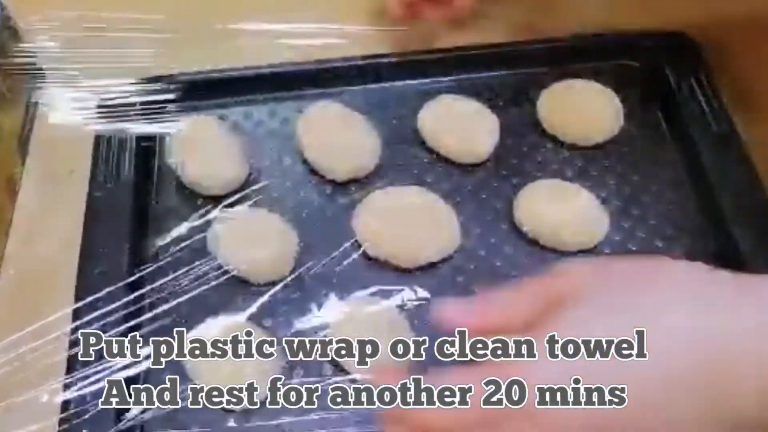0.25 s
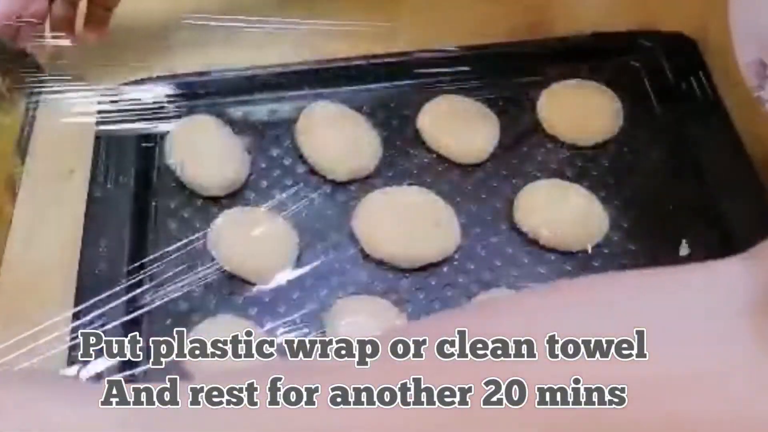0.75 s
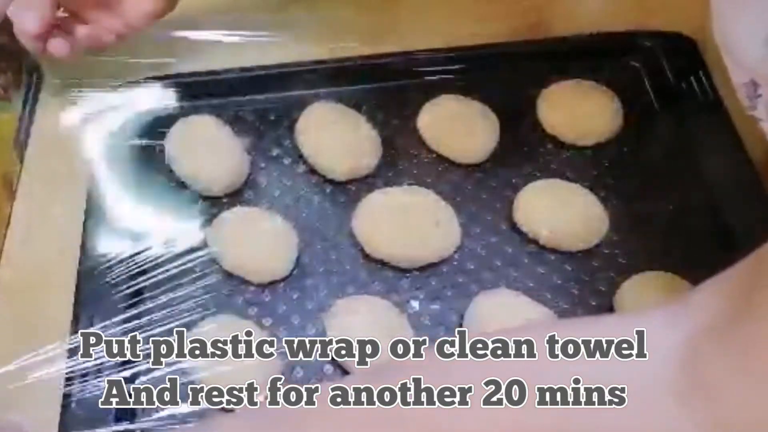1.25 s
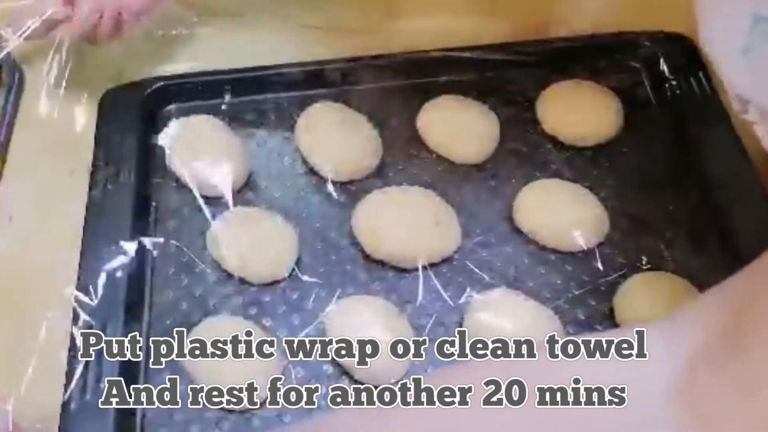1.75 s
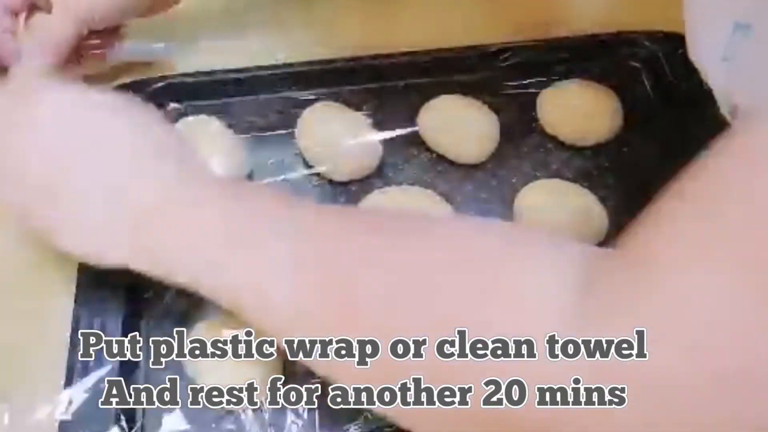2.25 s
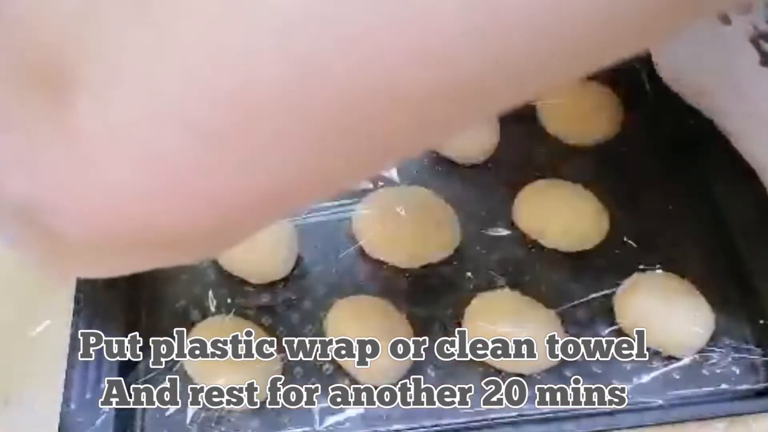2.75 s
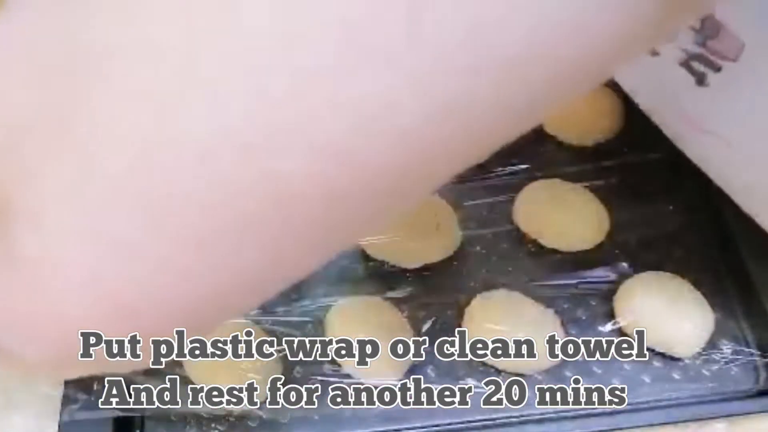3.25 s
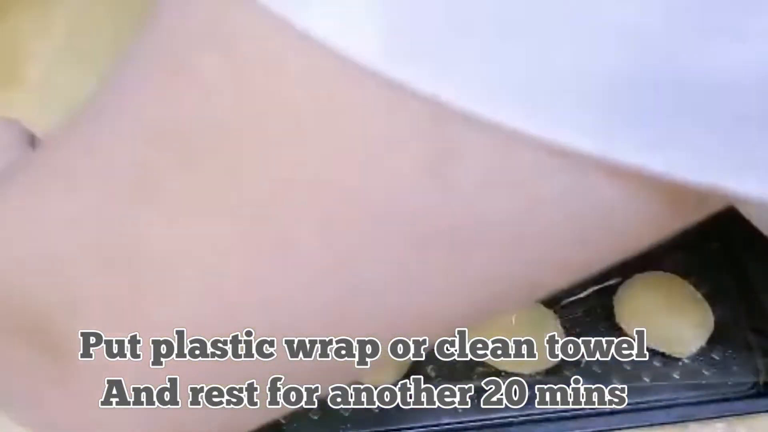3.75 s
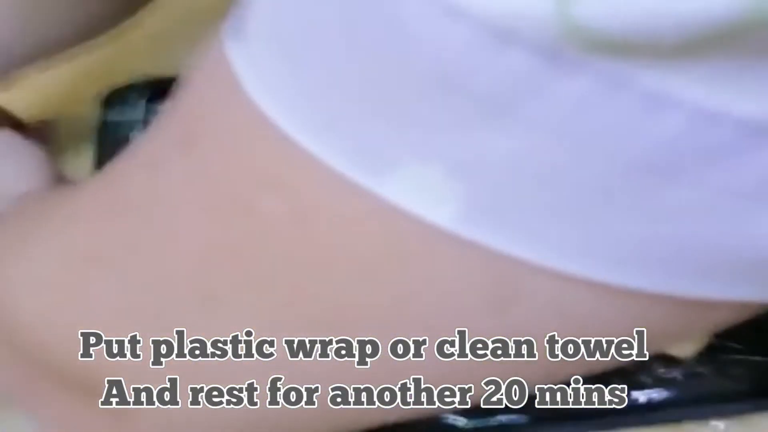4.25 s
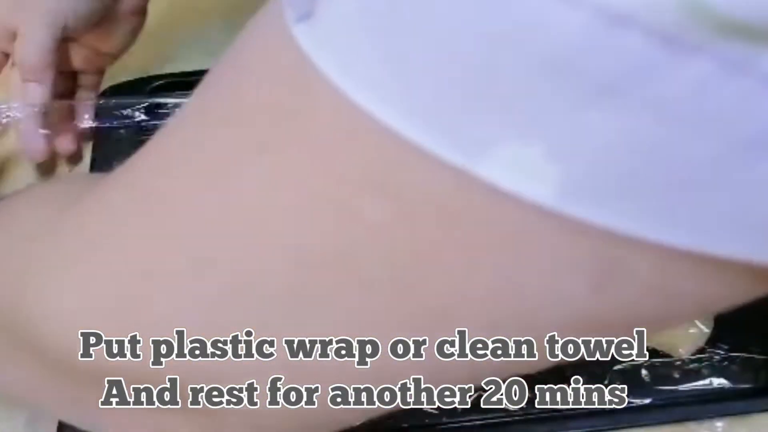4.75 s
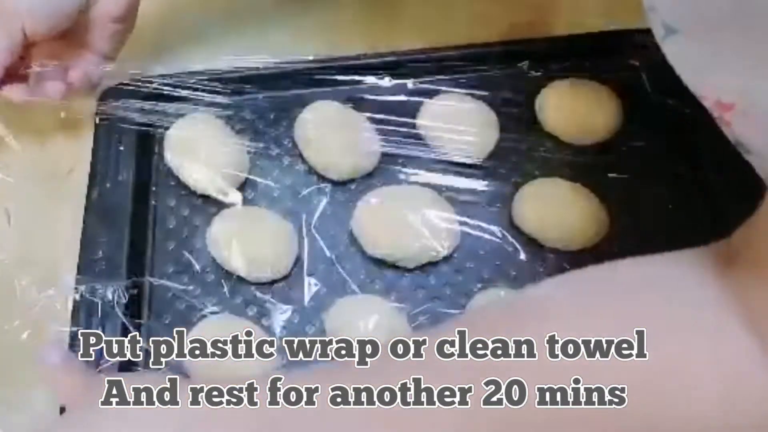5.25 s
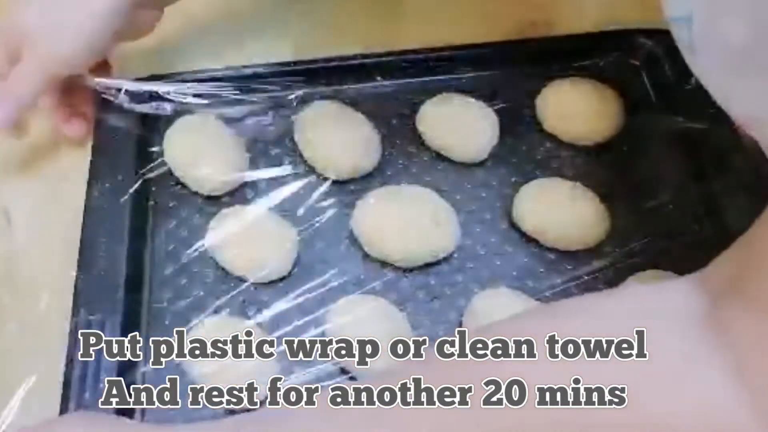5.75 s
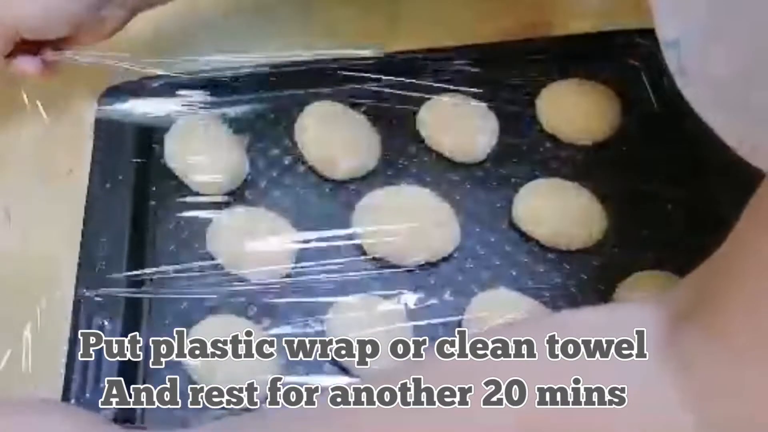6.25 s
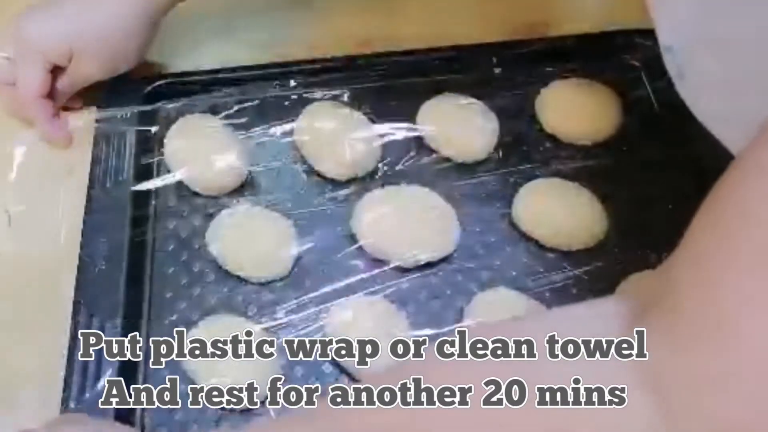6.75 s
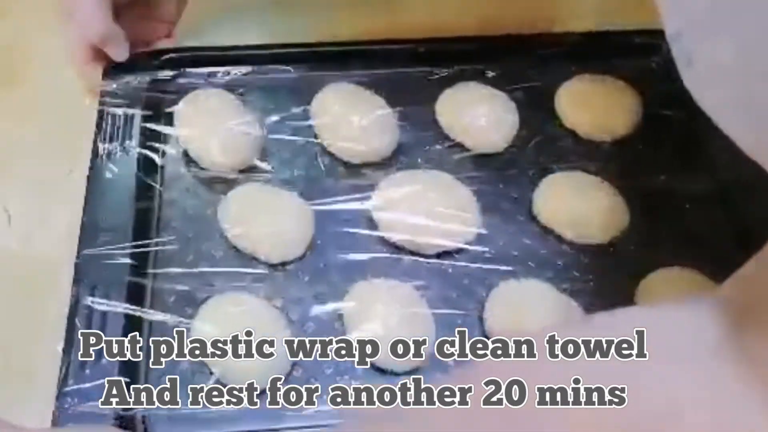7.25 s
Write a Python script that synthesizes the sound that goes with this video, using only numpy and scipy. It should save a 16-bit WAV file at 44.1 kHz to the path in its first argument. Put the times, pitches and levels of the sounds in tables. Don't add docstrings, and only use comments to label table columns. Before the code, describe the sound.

In a small, moderately live kitchen, a close microphone hears cling film being stretched over a metal baking tray on a wooden table. A faint low appliance hum and soft room wash run throughout. Faint film crackle opens, with a brighter rustle around 0.7 s. From 0.8 to 1.9 s the tray drags with a low rumble, light knocks and crisp snaps. After a quieter patch, a strong burst at 2.7-2.9 s mixes loud crackle, metallic ping and tray chatter. Dense bright ticks and snaps fill 3.2-3.7 s. At about 4.1 s the tray thumps down hard, then harder at 4.33 s, with deep wooden boom, bouncing metal clatter and a short ringing decay. A small scrape and finger slide come near 4.9 s. Sparse, quieter crinkles and ticks follow, with sharper little pulls at 6.5 and 6.8 s, until the end at 7.5 s.

```python
import sys
import numpy as np
from scipy import signal
from scipy.fft import rfft, irfft
from scipy.io import wavfile
from scipy.ndimage import uniform_filter1d

SR = 44100
rng = np.random.default_rng(int(sys.argv[2]) if len(sys.argv) > 2 else 0)


def invert_db(level):
    return 10 ** (np.asarray(level, dtype=float) / 20)


def to_wav(sig):
    pcm = np.clip(np.atleast_2d(sig), -1, 1) * 32767
    pcm = np.round(pcm).astype(np.int16)
    wavfile.write(sys.argv[1], SR, pcm.T)


N = 331146


def evened(x):
    return x / np.sqrt(np.mean(x ** 2) + 1e-20)


def read(points, hz):
    f, value = np.transpose(points)
    return np.interp(np.log(hz + 1), np.log(f + 1), value)


def add(mix, s, sound):
    part = mix[round(s * SR):][:len(sound)]
    part += sound[:len(part)]


def colour(x, points):
    hz = np.abs(np.fft.fftfreq(8192, 1 / SR))
    log_gain = np.log(invert_db(np.maximum(read(points, hz), -90)))
    taps = np.fft.ifft(np.exp(np.conj(signal.hilbert(log_gain)))).real[:4096]
    return signal.oaconvolve(x, taps / np.linalg.norm(taps))[:len(x)]


def level(rows, column=1):
    rows = np.asarray(rows)
    return invert_db(np.interp(np.arange(N) / SR, rows[:, 0], rows[:, column]))


def wavelet(hz, cycles):
    t = np.arange(round(cycles / hz * SR)) / SR
    envelope = np.sin(np.pi * (t / t[-1]) ** .85) ** .8
    return -np.sin(2 * np.pi * hz * t) * envelope


def bursts(per_s, spread_db, last_s):
    slips = rng.random(N) < per_s / SR
    size = invert_db(spread_db * np.minimum(rng.exponential(1, N), 3)) * slips
    decaying = signal.lfilter([1], [1, -np.exp(-1 / (last_s * SR))], size)
    puffs = uniform_filter1d(decaying, size=40)
    return evened(puffs * rng.standard_normal(N))


def split(x):
    top = signal.sosfiltfilt(signal.butter(3, 10300, "highpass", fs=SR, output="sos"), x)
    return x - top, top


def strokes(moves, levels_db, rise_db, fall_db_per_s):
    power, t = np.zeros(N), np.arange(SR) / SR
    for (s, rise, hold, *_), db in zip(moves, levels_db):
        swell_db = np.minimum(rise_db * (t / rise - 1), 0)
        fade_db = fall_db_per_s * np.maximum(t - rise - hold, 0)
        add(power, s, invert_db(2 * (db + swell_db - fade_db)))
    return np.sqrt(power)


# f/Hz, level/dB [dB per Hz]
WASH_SPECTRUM = [(12, -24.5), (30, 14.5), (45, -10.5), (85, -3.5), (140, -5), (240, -5), (370, -15.5),
                 (560, -13.5), (1100, -19), (1500, -26.5), (3000, -28), (8600, -40.5), (11000, -54),
                 (16000, -57)]
# t/s, level/dB
WASH_LEVEL = [(0, -48.5), (1, -49), (2, -49), (3, -48), (3.6, -51.5), (4.05, -48.5), (4.6, -53), (5, -50.5),
              (6, -50.5), (6.8, -51.5), (7.51, -49)]


def wash():
    frames, hz = N // 512 + 5, np.fft.rfftfreq(2048, 1 / SR)
    a, b, patches = rng.standard_normal((frames, 1025, 3)).T
    patches = evened(uniform_filter1d(uniform_filter1d(patches, 20, 0), 8, 1))
    spectra = (a + 1j * b) * invert_db(read(WASH_SPECTRUM, hz)[:, None] + 0.37 * patches)
    air = signal.istft(spectra, nperseg=2048, noverlap=1536)[1][:N]
    return evened(air) * level(WASH_LEVEL)


# multiple of the rotation rate [1], level/dB
MOTOR_ORDERS = [(1, -55), (2, -59), (3, -79), (4, -70.5), (6, -81), (7, -73), (8, -71), (9, -74), (10, -79)]
# t/s, level/dB of all orders, level/dB of the fifth order, which bodies moving in the
HUM_LEVEL = [(0, 1.5, -56), (.7, 1.5, -58.5), (1.2, 1.5, -62), (2.4, 3, -62), (3.1, 1, -66.5),
             (4, 4, -66), (4.6, -2.5, -69), (5.2, 2.5, -61), (6.5, -0.5, -64.5), (7.51, 1.5, -63)]
FRIDGE_HZ = [41.1, 48.26, 100.07, 200.13]
FRIDGE_DB = [-63, -65, -63, -72]


def hum():
    t = np.arange(N) / SR
    motor_hz = 104.47
    orders = sum(invert_db(db) * np.sin(2 * np.pi * (k * motor_hz * t + 0.097 * k)) for k, db in MOTOR_ORDERS)
    fifth = level(HUM_LEVEL, column=2) * np.sin(2 * np.pi * 5 * motor_hz * t)
    fridge = sum(invert_db(db) * np.sin(2 * np.pi * (hz * t + 0.22)) for hz, db in zip(FRIDGE_HZ, FRIDGE_DB))
    return np.sqrt(2) * ((orders + fridge) * level(HUM_LEVEL) + fifth)


# f/Hz, level/dB [dB per Hz]
FILM = [(880, -34.5), (1500, -13), (2050, -11), (2240, -5), (2870, -2), (3800, -3), (5600, -4),
        (6700, -0.5), (7580, -1.5), (8460, 0), (11000, -7), (14700, -10), (15400, -14), (16400, -15)]
# t/s of start, rise [s], hold [s], crackle level/dB, finest creases level/dB [relative]
PULLS = [(0.0, 0.0022, .01, -62, -4), (0.1, 0.31, .05, -60.5, -17), (0.697, 0.083, 0.0092, -47.5, -11),
         (1.283, 0.032, 0.21, -55.5, -10), (1.69, 0.064, .02, -64, -12), (1.898, 0.037, 0.015, -61, -16),
         (2.136, 0.031, 0.79, -70.5, -5.5), (2.68, 0.15, 0.067, -40.5, -13.5),
         (2.9, 0.16, 0.055, -51.5, -9), (3.245, 0.015, 0.016, -54, 1), (3.096, 0.32, .01, -46.5, -11),
         (3.427, 0.043, 0.025, -50.5, -10), (3.5, 0.072, 0.014, -51.5, -17), (3.637, 0.015, 0.013, -48, 2),
         (4.086, 0.023, .005, -53, -18), (4.187, 0.048, 0.097, -45.5, -11), (4.805, 0.1, .01, -54, -6.5),
         (5.27, 0.066, 0.022, -60.5, -15), (5.76, 0.039, 0.31, -59, -8.5), (6.013, 0.043, 0.087, -64, -12),
         (6.503, 0.0068, 0.015, -53.5, 3), (6.6, 0.045, 0.06, -71, -5), (6.744, 0.047, 0.009, -51, -7),
         (6.9, 0.24, 0.12, -69, -9), (7.347, 0.028, 0.075, -59, -24)]


def crackle():
    body, top = split(colour(.6 * bursts(350, 2.2, .001) + rng.standard_normal(N), FILM))
    db, top_db = np.transpose(PULLS)[-2:]
    rise_db, body_fall_db_per_s, fine_fall_db_per_s = 29, 141, 176
    rest_db, rest_top_db = -70, -18
    pull = np.hypot(strokes(PULLS, db, rise_db, body_fall_db_per_s), invert_db(rest_db))
    fine = np.hypot(strokes(PULLS, db + top_db, rise_db, fine_fall_db_per_s), invert_db(rest_db + rest_top_db))
    return evened(body) * pull + evened(top) * fine


# f/Hz, t60 [s]
KITCHEN = [(60, 0.37), (250, 0.36), (1000, 0.5), (2500, 0.65), (5000, 0.55), (8000, 0.43), (16000, 0.27)]


def room(x):
    taps = np.zeros(SR // 2)
    at = np.arange(160, len(taps) - 20, 20) + rng.integers(0, 20, (len(taps) - 161) // 20)
    taps[at] = rng.choice([-1., 1.], len(at))
    hz, t, z = signal.stft(taps, SR, nperseg=512)
    decay = invert_db(-60 * t / read(KITCHEN, hz)[:, None])
    tail = signal.istft(z * decay, SR, nperseg=512)[1]
    return signal.fftconvolve(x, tail / np.linalg.norm(tail))[:N]


# t/s, peak level/dB, ring f/Hz
TICKS = [(0.0176, -40.5, 7330), (1.076, -42, 8570), (1.2847, -44, 4200), (1.3932, -38.5, 7090),
         (1.7706, -40.5, 8300), (2.217, -40, 8450), (2.5115, -40, 4100), (2.813, -19, 9000),
         (3.1842, -40, 8440), (3.259, -33, 8500), (3.3595, -30, 8390), (3.3744, -32.5, 8900),
         (3.3894, -36, 7350), (3.4174, -39.5, 8400), (3.428, -27, 9500), (3.437, -30, 8580),
         (3.5379, -34, 8100), (3.567, -37, 8750), (3.6486, -35, 8740), (3.6636, -24, 8200),
         (5.3148, -46, 7100), (5.8047, -40, 7000), (5.8301, -40, 8800), (5.974, -35.5, 8600),
         (6.136, -42, 8800), (6.357, -43, 8700), (6.6694, -43, 8490), (6.69, -44, 8790), (6.795, -38, 8500),
         (7.3826, -45, 6660), (.981, -42.5, 8260), (1.1038, -45.5, 6000), (1.1564, -45, 7010),
         (3.217, -41, 8700), (3.271, -33, 8500), (3.281, -34.5, 7000), (3.301, -35, 8500),
         (3.3515, -29, 7900), (3.404, -31, 6000), (3.445, -33, 8490), (3.5451, -33, 7500),
         (3.557, -34, 5920), (3.607, -38, 8500), (3.697, -32, 6500), (3.73, -40, 7000), (5.3017, -49, 8770),
         (5.3232, -42, 7080), (5.4444, -48, 7380), (5.5935, -49, 10400), (5.838, -41, 7500),
         (5.89, -39, 7500), (5.9278, -40, 7000), (6.0437, -47, 8900), (6.097, -46, 9000),
         (6.1767, -46, 8500), (6.49, -54, 9000), (6.63, -45, 9000), (6.708, -46, 8500), (6.766, -42, 4500)]
# t/s, peak level/dB, ring f/Hz, low part level/dB
SNAPS = [(0.7212, -31.5, 8650, -4), (0.7515, -40, 8700, 4), (0.8144, -38, 7560, -15),
         (1.3128, -38, 8800, -7.5), (1.3168, -35, 3300, -1), (1.346, -25.5, 6800, -27),
         (1.4257, -35, 6500, -18), (1.4908, -20, 7050, -28), (1.5467, -26, 3350, 0), (1.8777, -36, 6900, 1),
         (2.6883, -36, 8900, -12), (2.7378, -26, 9300, -16), (2.7685, -25.5, 7080, -4.5),
         (2.7811, -25.5, 9800, -15), (2.8055, -19.5, 6800, -3), (3.0704, -26.5, 8600, -10.5),
         (3.2496, -28.5, 6730, -8.5), (3.3228, -24, 8970, -18), (3.343, -32, 7900, -26),
         (3.4087, -26, 9000, -30), (3.4516, -22, 8430, -35), (3.5758, -31, 8800, -24),
         (3.6195, -30.5, 6840, -17), (3.6551, -20.5, 8640, -14), (3.68, -18, 8000, -13),
         (4.8921, -32.5, 8840, -2.5), (5.9002, -35.5, 8550, -16), (6.5136, -26, 5050, -12),
         (6.7526, -34.5, 4600, -12), (6.786, -41, 8600, 5)]
# t/s, peak level/dB, ring f/Hz, low part level/dB
MORE_SNAPS = [(4.1035, -38, 5000, -2), (4.13, -21, 8800, -6), (4.167, -31, 7410, -2), (4.204, -35, 8200, 6),
              (4.2386, -20, 9240, -17), (4.3287, -23.5, 6560, -6), (4.342, -29, 4170, 11.5),
              (4.3662, -29.5, 4580, 13), (4.6878, -39, 7040, -18), (2.7005, -39, 7200, -8),
              (2.7305, -40, 7500, -14), (2.829, -27, 7800, -4), (6.5075, -37, 7300, -20),
              (6.676, -47, 8300, -20), (6.684, -47, 8600, -20), (1.243, -40, 12300, -25),
              (1.005, -48, 8000, -10), (.94, -48, 9000, -20), (5.9, -47, 8000, -15), (5.398, -46, 9000, -12),
              (5.7, -48, 8500, -20), (4.87, -42, 5100, -14), (4.908, -37, 9000, -4), (4.995, -42, 4500, -3),
              (4.958, -43, 6800, -15), (3.332, -36, 4500, -10), (4.019, -44, 5200, -1), (4.659, -49, 7150, -14)]


def snaps():
    full = SNAPS + MORE_SNAPS
    tick_low_db, lead_s = -18.5, .0006
    rows = full + [(*row, tick_low_db) for row in TICKS]
    out, t = np.zeros(N), np.arange(400) / SR
    bursts_of_noise = rng.standard_normal((len(rows), 400))
    low = signal.butter(2, [900, 3500], "bandpass", fs=SR)
    thin = signal.butter(2, 5200, "highpass", fs=SR)
    for k, ((s, db, hz, low_db), noise) in enumerate(zip(rows, bursts_of_noise)):
        puff = noise * np.exp(-t / .0007) * (1 - np.exp(-(t / .001) ** 2))
        body, top = split(colour(puff, FILM))
        click = body + invert_db(-3.5) * top
        if k >= len(full):
            click = signal.lfilter(*thin, click)
        patch_envelope = np.exp(-t / .00035) * (1 - np.exp(-(t / .0005) ** 2)) * 6
        patch = np.sin(2 * np.pi * hz * t) * patch_envelope
        dull = signal.lfilter(*low, noise * np.exp(-t / 0.0021) * (1 - np.exp(-t / .001)))
        snap = 0.75 * click / abs(click).max() + 0.56 * patch + invert_db(low_db) * dull / abs(dull).max()
        add(out, s - lead_s, invert_db(db) * snap)
    return out


# f/Hz, level/dB [dB per Hz]
RATTLE = [(530, -22), (900, -2.5), (1070, -0.5), (1200, -9), (1730, -10.5), (2320, -3.5), (3160, -2.5),
          (3670, -9), (4240, -6), (5000, -12.5), (6500, -24), (11000, -120)]
# f/Hz, level/dB [dB per Hz]
RUMBLE = [(71, -27), (120, -18), (210, 4.5), (372, -0.5), (418, 3), (484, -0.5), (521, 1), (813, -7.5),
          (1500, -10.5), (1950, -14.5), (3300, -120)]
# t/s of start, rise [s], hold [s], rattle level/dB, rumble level/dB
DRAGS = [(0.633, 0.13, 0.025, -52, -52), (0.8, 0.72, .08, -52.5, -45), (1.405, .146, 0.012, -50, -42),
         (1.869, .01, 0.036, -60, -46), (2.32, 0.21, 0.23, -60, -58), (2.77, 0.04, 0.08, -41, -36),
         (2.806, .006, 0.092, -46.5, -45.5), (2.962, .01, .05, -53.5, -66), (3, 0.37, .01, -56.5, -54),
         (3.577, 0.074, .01, -76, -56), (4.327, .012, 0.057, -39, -50), (4.42, 0.011, 0.071, -45.5, -55),
         (4.748, .05, .06, -61.5, -63), (4.86, 0.022, 0.096, -58, -53), (6.504, 0.011, .01, -57, -67),
         (6.702, 0.087, 0.059, -62, -54.5), (7.255, 0.17, 0.013, -58.5, -52)]


def drag():
    rattle = evened(colour(bursts(500, 2.5, 0.0029) + 0.64 * rng.standard_normal(N), RATTLE))
    rumble = evened(colour(rng.standard_normal(N), RUMBLE))
    rattle_db, rumble_db = np.transpose(DRAGS)[-2:]
    rise_db, rattle_fall_db_per_s, rumble_fall_db_per_s = 14.5, 144, 169
    return (rattle * strokes(DRAGS, rattle_db, rise_db, rattle_fall_db_per_s)
            + rumble * strokes(DRAGS, rumble_db, rise_db, rumble_fall_db_per_s))


# t/s of start, length [s], centre f/Hz, width [Hz], level/dB
SLIDES = [
    (0.73, 0.17, 2400, 500, -55),
    (1.4, 0.2, 2150, 330, -57),
    (1.4, 0.2, 4270, 700, -57.5),
    (4.875, 0.16, 2550, 300, -51),
    (0.768, .027, 8600, 700, -37),
    (6.778, .036, 8600, 900, -48),
    (1.352, .03, 7200, 800, -48),
]


def slides():
    out, noise = np.zeros(N), rng.standard_normal((len(SLIDES), SR // 2))
    for (s, length, hz, width_hz, db), hiss in zip(SLIDES, noise):
        edges = [hz - width_hz / 2, hz + width_hz / 2]
        band = signal.sosfilt(signal.butter(2, edges, "bandpass", fs=SR, output="sos"), hiss)
        u = np.linspace(0, 1, round(length * SR))
        skew = np.clip(.03 / length, .55, 1)
        add(out, s, invert_db(db) * evened(band)[:len(u)] * np.sin(np.pi * u ** skew) ** 1.5)
    return out


# t/s, peak level/dB, f/Hz, t60 [s]
PINGS = [(.748, -39, 2080, 0.053), (1.285, -39, 1440, 0.026), (1.544, -40, 2400, 0.042),
         (1.878, -45, 2230, 0.082), (2.781, -20, 2470, 0.025), (2.782, -27, 3060, 0.028),
         (2.806, -27.5, 962, 0.091), (2.806, -36, 1250, .08), (2.83, -33, 1110, 0.21),
         (2.826, -36, 3020, .05), (3.729, -49, 2390, 0.043), (4.103, -41, 900, .03),
         (4.111, -17, 1045, 0.034), (4.342, -34, 2500, 0.21), (4.152, -36, 2340, .04),
         (4.153, -30, 1230, .04), (4.181, -38, 2300, .03), (4.238, -30, 2140, 0.038),
         (4.888, -49.5, 1230, .15), (4.905, -33.5, 1910, 0.041), (4.905, -55, 3300, .06),
         (6.513, -41, 2400, 0.033), (6.79, -43.5, 2027, 0.071), (6.787, -44, 3096, 0.033),
         (7.383, -48, 1580, .06)]
# t/s, peak level/dB, f/Hz
KNOCKS = [(1.204, -41, 217), (1.309, -42, 226.8), (1.476, -28.5, 285), (1.545, -24.5, 419),
          (1.88, -30.5, 279), (2.552, -38, 203), (2.627, -33.5, 214), (2.785, -31.5, 314),
          (4.881, -33, 178), (6.79, -38.5, 257), (6.819, -36, 201)]
# t/s, peak level/dB, f/Hz, cycles [1]
SHOVES = [
    (2.54, -40, 85.5, 5.3),
    (2.922, -41.5, 39, 5.2),
    (4.9, -47, 47.6, 5.5),
    (4.9, -42.5, 110, 6.8),
]


def knocks():
    out, t = np.zeros(N), np.arange(SR // 4) / SR
    for s, db, hz in KNOCKS:
        add(out, s, invert_db(db) * wavelet(hz, 2.83))
    for s, db, hz, cycles in SHOVES:
        add(out, s, invert_db(db) * wavelet(hz, cycles))
    for s, db, hz, t60 in PINGS:
        pair = np.sin(2 * np.pi * hz * t) + 0.5 * np.sin(2 * np.pi * 0.93 * hz * t)
        add(out, s, invert_db(db - 60 * t / t60) * pair * (1 - np.exp(-t / 0.0026)))
    return out


# t/s, peak level/dB, boom f/Hz, cycles [1], clatter level/dB
BLOWS = [(4.1086, -2.5, 275, 3.48, -27.5), (4.130, -10, 189, 1.3, -36), (4.153, -30, 260, 4.2, -24),
         (4.178, -20.5, 540, 3.5, -31), (4.204, -26, 302, 3.1, -31), (4.3291, 1, 242, 1.24, -20.5),
         (4.341, -13.5, 316, 3.6, -17.5), (4.357, -8, 252, 3.3, -23), (4.366, -18, 292, 1.9, -17),
         (4.335, -14, 330, 2.2, -20.5), (4.383, -13.5, 210, 1.33, -25.5), (4.394, -14, 200, 1.17, -27),
         (4.138, -14, 200, 1.2, -35)]
# f/Hz, level/dB [dB per Hz]
CLATTER = [(240, -33.5), (500, 3.5), (1100, -7), (1700, -12.5), (2500, -10.5), (3200, -23), (4200, -26.5),
           (7000, -30), (16000, -57)]
LANDINGS = [4.112, 4.331]
# f/Hz, level/dB, t60 [s]
RINGS = [
    [(44.2, 7.5, 0.21), (134, -5, 0.72), (244, -12, 0.19), (420, -7.5, 0.31), (545, -9, 0.41),
     (609, -11.5, 0.28), (715, -18, 0.38), (827, -19, 0.34), (185, -12, 0.28), (1110, -30, 0.4),
     (1365, -26, 0.34), (1830, -35, .4), (2290, -30, .4)],
    [(42, -2, 0.39), (134.1, 1, 0.58), (242, -5, 0.32), (604, -17, 0.45), (725, -10, 0.23), (270, -6, .3),
     (325, -14, 0.33), (2020, -27, 0.45), (1136, -18, 0.55), (1010, -27, 0.4), (1626, -16, 0.45),
     (2330, -31, .5), (2880, -20, 0.61)],
]
RING_DB = [-16, -18]


def thumps():
    out, t = np.zeros(N), np.arange(SR // 2) / SR
    noise = rng.standard_normal((len(BLOWS), 4000))
    for (s, db, hz, cycles, clatter_db), n in zip(BLOWS, noise):
        add(out, s, invert_db(db) * wavelet(hz, cycles))
        add(out, s, invert_db(clatter_db) * colour(n * np.exp(-t[:4000] / 0.0068), CLATTER))
    rings = np.zeros(N)
    build_up = 1 - np.exp(-(t / 0.0049) ** 2)
    for s, modes, ring_db in zip(LANDINGS, RINGS, RING_DB):
        ring = sum(invert_db(db - 60 * t / min(t60, .6)) * np.sin(2 * np.pi * hz * t) for hz, db, t60 in modes)
        add(rings, s, -invert_db(ring_db) * ring * build_up)
    return out + rings + invert_db(-4.5) * room(out)


def scene():
    near, moving, rubbing = snaps() + knocks(), crackle() + drag(), slides()
    echoes = room(invert_db(-7.0) * near + invert_db(-18.0) * moving + invert_db(-10) * rubbing)
    return (near + moving + rubbing + echoes + thumps() + wash() + hum())[None]


def roll_off(x):
    return signal.sosfilt(signal.butter(12, 16520, fs=SR, output="sos"), x)


# f/Hz, level/dB
MICROPHONE = [(20, -5.5), (40, -1), (3300, -2), (3700, -7.5), (4100, -1)]


def record(dry):
    hz = np.fft.rfftfreq(N, 1 / SR)
    band_limit = np.clip((16250 - hz) / 500, .03, 1)
    gain = invert_db(read(MICROPHONE, hz)) * band_limit
    self_noise_db = -73.5
    heard = dry + invert_db(self_noise_db) * rng.standard_normal(dry.shape)
    mix = irfft(rfft(heard) * gain, N)
    return roll_off(mix)


dry = scene()
out = record(dry)
to_wav(out)
```